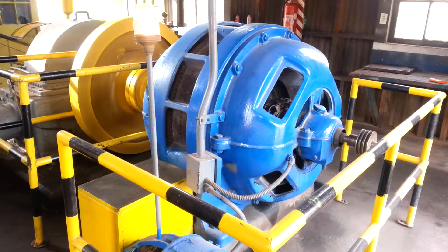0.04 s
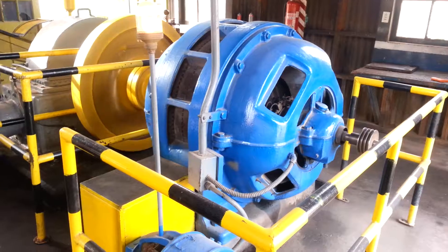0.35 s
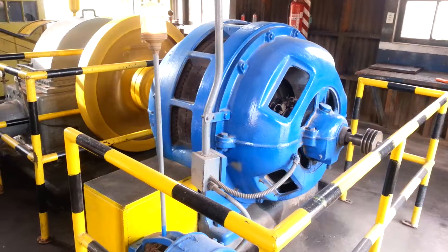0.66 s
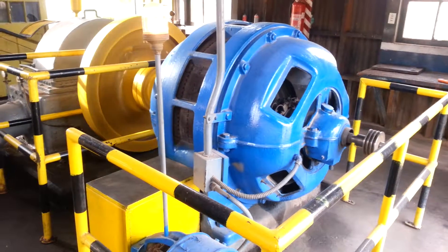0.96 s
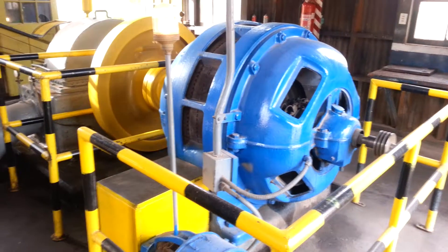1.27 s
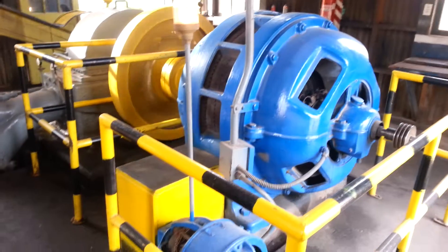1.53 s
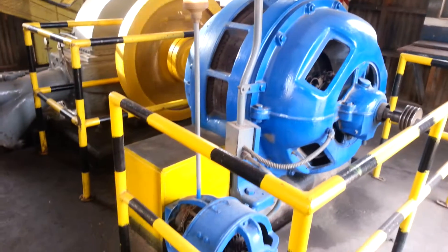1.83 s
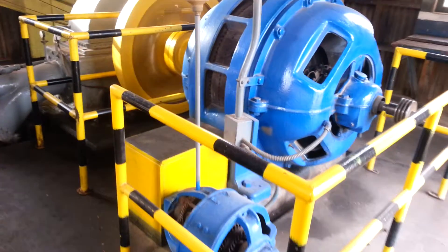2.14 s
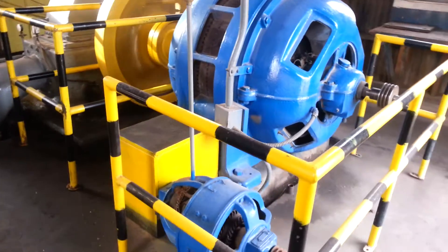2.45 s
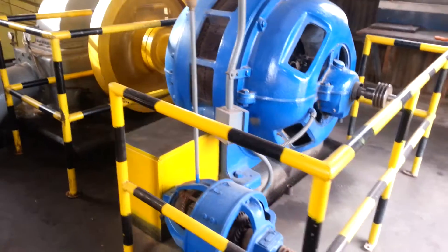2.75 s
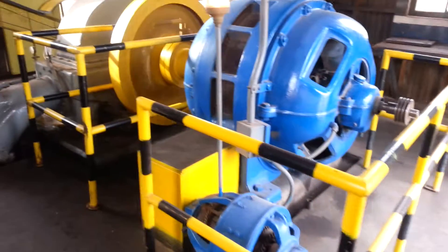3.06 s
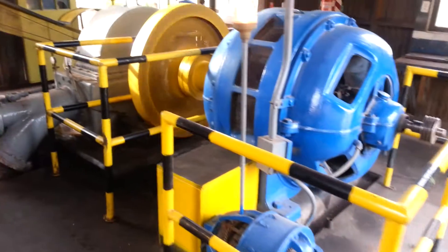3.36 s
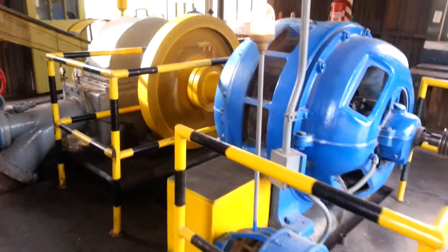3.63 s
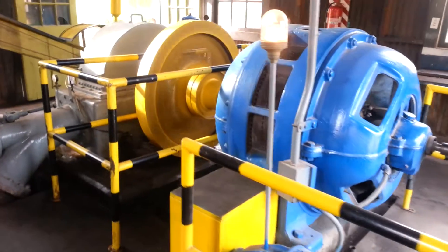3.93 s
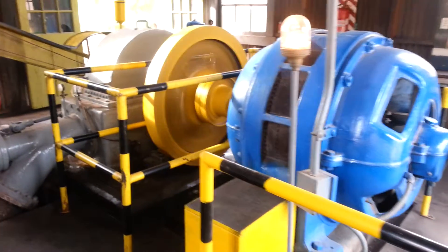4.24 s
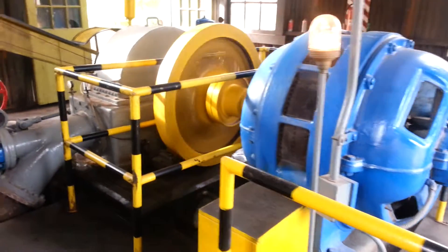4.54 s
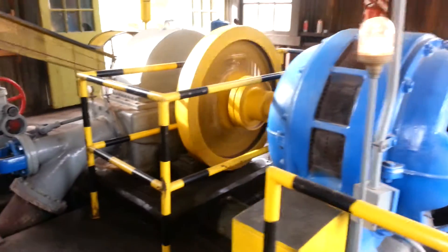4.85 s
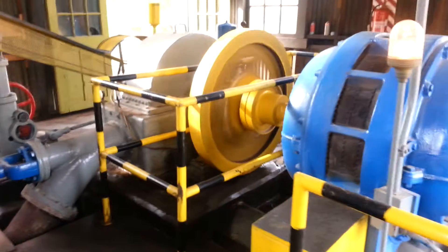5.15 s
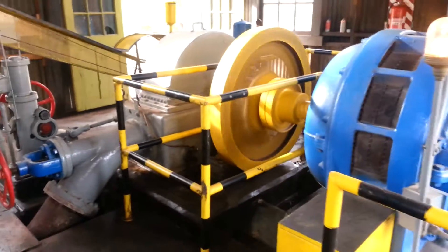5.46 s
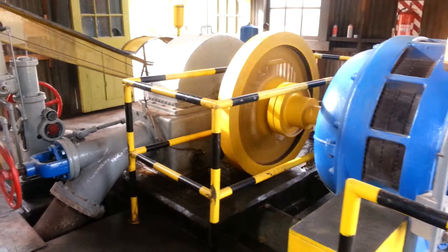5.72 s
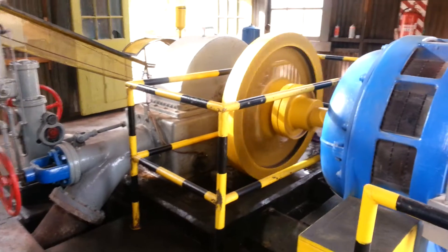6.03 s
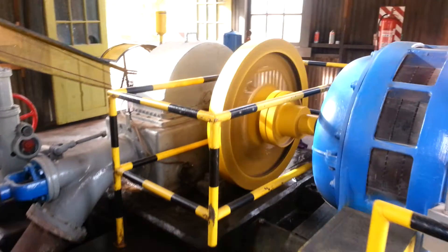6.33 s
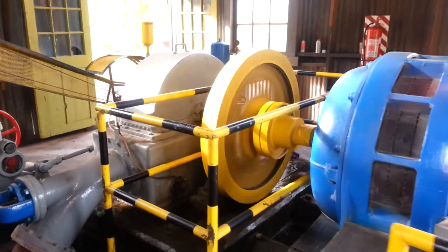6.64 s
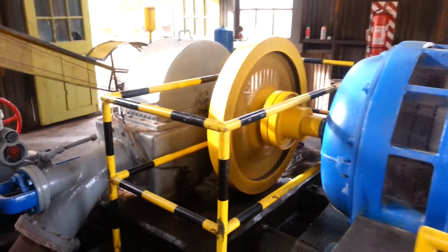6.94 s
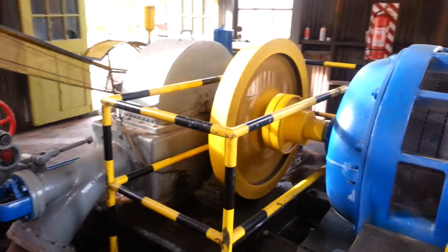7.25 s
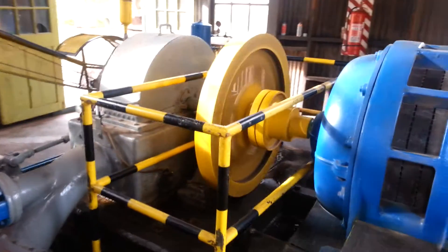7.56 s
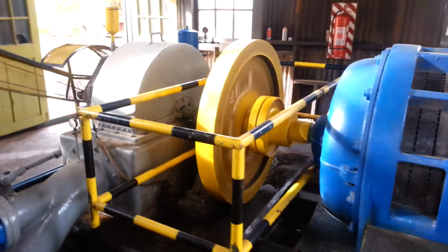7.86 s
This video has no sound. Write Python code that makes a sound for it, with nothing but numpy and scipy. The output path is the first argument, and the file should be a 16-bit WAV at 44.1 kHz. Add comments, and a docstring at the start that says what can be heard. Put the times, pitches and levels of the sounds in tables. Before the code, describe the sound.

After a brief silence, the loud roar of a water turbine fades in and runs steadily inside a hard-walled machine hall. A generator adds a low hum and many higher whining tones, while the iron casing rings with a fast, slight throb. The tones swell and sink as the stereo microphone is carried along the machines. A low tone slides down briefly midway, and the hiss and hum grow a little stronger toward the end.

```python
"""A water turbine roars in a hard-walled hall, driving a flywheel and a generator.
Turbulent flow gives broadband noise that throbs with the shaft and excites the iron casing's modes.
The generator hums and whines; tones swell and sink as a camera, carried along the railing, takes its
two microphones through the hall's standing waves. A low tone slides down once and a hand bumps the
camera. The sound fades in and its peaks clip."""
import sys
import numpy as np
from scipy import signal
from scipy.fft import rfft, irfft, next_fast_len
from scipy.io import wavfile
from scipy.ndimage import uniform_filter1d, map_coordinates

SR = 44100
rng = np.random.default_rng(int(sys.argv[2]) if len(sys.argv) > 2 else 0)


def write(x):
    x = np.atleast_2d(x).T
    wavfile.write(sys.argv[1], SR, np.round(np.clip(x, -1, 1) * 32767).astype(np.int16))


N = 356769


def amp(db):
    """Amplitude ratio of a level in decibels."""
    return 10 ** (np.asarray(db) / 20)


def unit(x):
    """Normalisation to rms 1."""
    return x / np.sqrt(np.mean(x ** 2) + 1e-20)


def spectrum_at(points, hz):
    """Interpolation of (frequency, value) points on a logarithmic frequency axis."""
    point_hz, values = np.transpose(points)
    return np.interp(np.log(hz + 1), np.log(point_hz + 1), values)


def curves(rows):
    """Linear interpolation in time: one curve for each column after the first."""
    time_s, *columns = np.transpose(rows)
    return [np.interp(np.arange(N) / SR, time_s, column) for column in columns]


def wobble(rate_hz):
    """Slow random modulation of rms about 1: a spline through rate_hz knots a second."""
    coarse = np.linspace(0, N, 2048)
    knots = rng.standard_normal(2048)
    spline = map_coordinates(knots, [coarse * rate_hz / SR], mode="wrap")
    return np.interp(np.arange(N), coarse, spline)


def hump(centre_s, width_s):
    """Gaussian envelope of height 1, width_s wide at half height."""
    t = np.arange(N, dtype=np.float32) / SR
    return np.exp2(-np.minimum((2 * (t - centre_s) / width_s) ** 2, 20))


def filtered(x, response):
    """Linear filtering: the spectrum of x times a frequency response."""
    size = next_fast_len(N + SR // 4)
    return irfft(rfft(x, size) * response(np.fft.rfftfreq(size, 1 / SR)), size)[..., :N]


def split(x, edge_hz):
    """Complementary crossover: the parts of x below and above an edge."""
    low = filtered(x, lambda hz: 1 / (1 + (hz / edge_hz) ** 4))
    return low, x - low


# Likeness of the hall's sound at the two microphones: frequency_hz, correlation
COHERENCE = [(40, .8), (100, .89), (190, .96), (400, .85), (600, .74), (800, .63), (1000, .38), (1300, .06),
             (1600, -.14), (2050, -.2), (2500, .18), (2850, .16), (3400, .06), (4400, .08), (6000, 0)]
def mid_side_gains(hz):
    """Spatial coherence: long waves reach both microphones alike, short ones unrelated."""
    correlation = spectrum_at(COHERENCE, hz)
    return np.sqrt([(1 + correlation) / 2, (1 - correlation) / 2])


def hall_noise(response):
    """Diffuse field: stereo noise of rms 1, coloured by a frequency response."""
    mid, side = filtered(rng.standard_normal((2, N)), lambda hz: response(hz) * mid_side_gains(hz))
    return unit(np.array([mid + side, mid - side]))


# The walk, from 0 beside the generator to 1 closest to the turbine: time_s, nearness
WALK = [(.9, 0.17), (1.8, 0.3), (2.5, 0), (3.2, 0.071), (4.4, 0.4), (6.1, 0.69), (7.6, 0.82), (8.09, 0.68)]
def approach(generator_db, rise_db):
    """Level rises as distance falls: the gain of one band as the microphones near the turbine."""
    nearness, = curves(WALK)
    return amp(generator_db + rise_db * nearness)


SHAFT_HZ = 12.15
def throb(clock, turn_db, blade_db, churn_db):
    """Amplitude modulation: the flow surges once a turn, is chopped by blades and churns at random."""
    angle = 2 * np.pi * SHAFT_HZ * clock
    harmonics = [(4, .45), (8, .55), (12, .5)]  # shaft_order, weight
    blades = sum(weight * np.cos(order * angle + rng.uniform(0, 2 * np.pi))
                 for order, weight in harmonics)
    return amp(turn_db * np.cos(angle) + blade_db * blades + churn_db * wobble(22))


# Spectral density of rushing water and cooling air: frequency_hz, relative_level_db
FLOW_SPECTRUM = [(22, -56), (45, -33), (70, -19.5), (105, -15.5), (150, 0.5), (280, 0), (500, -3.5),
                 (900, -7.5), (1500, -8.5), (1900, -13.5), (3600, -20), (6000, -27), (11000, -40),
                 (15600, -46.5)]
# Rumble of the pipe along the walk: time_s, gain_db
PIPE_RUMBLE = [(.9, -4.5), (1.9, -0.5), (2.8, -2), (3.6, -0.5), (4.3, 0), (5.0, -2.5), (6.2, -0.5),
               (7.2, 1.5), (8.09, -8)]
def water(clock):
    """Turbulence radiates broadband noise: rumble in the pipe, roar in the runner, hiss of spray."""
    flow = hall_noise(lambda hz: amp(spectrum_at(FLOW_SPECTRUM, hz)))
    rumble, rest = split(flow, edge_hz=300)
    body, rest = split(rest, edge_hz=770)
    roar, rest = split(rest, edge_hz=2700)
    hiss, spray = split(rest, edge_hz=9500)
    rumble_db, = curves(PIPE_RUMBLE)
    rumble *= amp(rumble_db)
    body *= approach(-0.5, rise_db=0.2) * throb(clock, turn_db=0.0, blade_db=-0.5, churn_db=0.0)
    roar *= approach(-0.2, rise_db=3.5) * throb(clock, turn_db=0.15, blade_db=1.0, churn_db=1.5)
    treble = approach(-2.2, rise_db=2.5) * hiss + approach(-2.5, rise_db=7) * spray
    treble *= throb(clock, turn_db=0.53, blade_db=1.0, churn_db=1.0)
    return amp(-12.0) * (rumble + body + roar + treble)


# Loud and dead spots along the walk: centre_s, pitch_hz, width_s, gain_db
STANDING_WAVES = [(4.0, 85, .5, 3), (5.7, 85, .6, 10), (3.8, 98, .5, 6), (6.1, 98, 1.5, 4.5),
                  (7.9, 98, .7, 8), (1.4, 122, 1.2, -4), (5.2, 122, 1.2, 3), (7.7, 122, 1, -7),
                  (4.5, 146, 1.4, 4), (7.7, 146, .8, -6), (1.7, 194, .22, 4.5), (2.2, 194, .35, 5),
                  (2.7, 194, .36, 11.6), (3.05, 194, .25, 7.5), (3.38, 194, .33, 7.8),
                  (3.78, 194, .17, -10), (4.05, 194, .2, 3.5), (4.3, 194, .17, -5), (4.7, 194, .45, 4),
                  (5.5, 194, .25, -2.5), (6.12, 194, .25, 3.8), (6.56, 194, .12, -10), (6.75, 194, .5, 4.5),
                  (7.28, 194, .4, 5.5), (7.9, 194, .65, 15.3), (2.1, 242.5, .7, 9), (.7, 245, 1, -6),
                  (8.0, 245, .9, -10), (1.05, 305, .3, 6), (2.25, 305, .7, 8), (3.1, 305, .25, 7),
                  (7.9, 305, .8, -8), (4.6, 393, 2.2, 5.5), (7.5, 420, 1, 7), (7.9, 576, 1.2, 14.5),
                  (4.7, 587, 1, -4), (1.2, 587, .6, -7), (3.42, 587, .7, 12), (6.15, 587, 1, 10),
                  (6.6, 607, .5, 8), (1.1, 620, .9, -9), (2.5, 620, .6, -6), (5.8, 620, .35, 7),
                  (6.4, 620, .4, 6), (.95, 722, .6, 12.5), (1.8, 722, .6, 7), (.9, 770, .55, 10),
                  (7.0, 770, .42, 16), (7.58, 770, .6, 12.5), (4.7, 781, .35, 10.5), (5.9, 781, .4, 16),
                  (6.4, 781, .35, 15), (7.05, 781, .35, 13), (1.45, 966, .45, 8.5), (2.1, 966, .7, 9.5),
                  (6.05, 966, .3, 10.5), (7.7, 966, .9, 9.5), (1.1, 1007, 1, 13.5), (1.25, 1036, 1, 14),
                  (7.4, 1036, .9, 12), (.92, 1056, 1.05, 17.5), (6.7, 1056, .6, 7), (7.55, 1056, .45, 10),
                  (3.45, 1177, 1, 12), (4.9, 1177, 1, 7), (6.5, 1177, .6, 10), (2.3, 1227, .7, 8),
                  (3.1, 1227, .4, 6), (5.2, 1227, .8, 10), (.9, 1191, .8, -3), (2.2, 1191, .9, -3),
                  (5.7, 1191, 1, 2), (7.2, 1191, .4, 3), (8.05, 1191, .9, -13), (.7, 1364, .7, -5),
                  (2.3, 1364, .9, 2), (4.2, 1364, .4, 2.5), (6.75, 1364, .8, 3), (8.05, 1364, .5, -5),
                  (1.42, 1450, .45, 12), (2.1, 1450, .6, 7), (5.5, 1450, .8, 7), (6.45, 1450, .35, 10.5),
                  (7.25, 1450, .8, 9), (1.35, 1474, .4, 7), (3.1, 1474, .35, 6), (3.8, 1474, .45, 8),
                  (4.5, 1474, .4, 6), (5.3, 1474, .5, 9), (5.95, 1474, .4, 10), (6.45, 1474, .3, 7),
                  (7.9, 1474, .7, -7), (1.0, 1513, .7, 10), (3.1, 1594, .6, 4), (5.35, 1594, .8, 7),
                  (1.1, 2515, .6, 3.5), (6.2, 2515, .35, 3.5), (6.7, 2515, .3, -2), (7.1, 2515, .3, 4),
                  (7.6, 2515, .3, 2), (1.05, 2810, .25, 3.5), (1.75, 2810, .9, 3), (2.9, 2810, .6, -1.5),
                  (3.66, 2810, .3, 2.8), (4.67, 2810, .16, 3), (5.4, 2810, .8, -1.5), (6.15, 2810, .18, 3),
                  (6.5, 2810, .3, -2), (7.2, 2810, .3, 1.2), (8.05, 2810, .4, -4), (1.9, 3084, .4, 5),
                  (3.55, 3084, .4, -9), (4.05, 3084, .3, 7), (4.1, 3199, .8, 7), (5.05, 3230, .4, 12),
                  (7.35, 3230, .4, 5), (6.3, 4302, .6, 10.5), (7.3, 4302, .4, 10), (2.1, 4449, 2, -3),
                  (3.45, 4449, .3, -2), (4.05, 4449, .15, 5), (5.4, 4449, .25, 2), (6.1, 4449, .25, 2.2),
                  (6.78, 4449, .15, 4), (7.0, 4449, .2, -3.5), (7.23, 4449, .16, 3.5),
                  (7.45, 4449, .2, 1.5), (8.0, 4449, .5, -2.5), (2.8, 6973, .2, 3), (3.75, 6973, .45, 2),
                  (4.85, 6973, .4, 3.5), (7.1, 6973, 2, -2), (1.75, 9100, .2, 12)]
def swell_db(hz):
    """Standing waves: a tone or mode rises near its antinodes and dips near its nodes."""
    return sum(gain_db * hump(centre_s, width_s)
               for centre_s, pitch_hz, width_s, gain_db in STANDING_WAVES if pitch_hz == hz)


def resonances(modes):
    """Resonance under random forcing: each mode passes a narrow band of noise, and their powers add."""
    def power(f):
        return sum(amp(db) ** 2 / (1 + ((f * f - hz * hz) / ((f + 1) * width_hz * 1.75)) ** 2) ** 2
                   for hz, width_hz, db in modes)
    rms = np.sqrt(sum(amp(db) ** 2 * width_hz for _, width_hz, db in modes))
    return rms * hall_noise(lambda f: np.sqrt(power(f)))


def shifting_echoes(x, depth_db):
    """Selective fading: neighbouring bands swell and sink separately as echoes shift; rms 1."""
    spectra = signal.stft(x, nperseg=2048)[2]
    fading = uniform_filter1d(rng.standard_normal(spectra.shape[1:]), size=4, axis=0)  # over frequency
    for frames in (12, 5):  # over time
        fading = uniform_filter1d(fading, size=frames, axis=1)
    faded = signal.istft(spectra * amp(depth_db * unit(fading)), nperseg=2048)[1]
    return unit(faded[:, :N])


# Resonances of the casing and pipes: pitch_hz, bandwidth_hz, relative_level_db
CASING_MODES = [(305, 30, -8), (386, 20, -7.5), (620, 38, -9), (733, 23, -8), (777, 17, -9), (965, 30, -6),
                (1191, 55, -3), (1364, 93, -7), (1456, 28, -7.5), (1512, 63, -7.8), (1689, 20, -11.2),
                (2063, 149, -12.5), (2515, 110, -10.5), (2706, 35, -8.8), (2810, 140, -7.2),
                (3084, 41, -13), (3184, 27, -12.6), (3560, 250, -22), (4282, 75, -18.5), (4449, 240, -18.2),
                (5032, 165, -26.5), (5620, 456, -32), (6973, 381, -26.7), (7529, 176, -32.8),
                (9100, 600, -44), (9836, 434, -40.6)]
# Strength of the ring along the walk: time_s, low_gain_db, middle_gain_db
RING_GAINS = [(.9, 4.5, -5), (1.5, 1, -3), (2.2, 1.8, -0.5), (3.0, 0.5, 0), (3.6, 1.5, -1.5),
              (4.5, 0, -0.5), (5.3, 0.4, 4), (6.2, -0.5, 1.5), (6.9, -4, 3), (7.55, 3, 2), (8.09, 1, 2)]
def casing(clock):
    """Forced vibration: churning water rings the iron casing; high modes carry best near the turbine."""
    swelling_hz = [row[1] for row in STANDING_WAVES]
    even = resonances([mode for mode in CASING_MODES if mode[0] not in swelling_hz])
    swelling = sum(amp(swell_db(mode[0])) * resonances([mode])
                   for mode in CASING_MODES if mode[0] in swelling_hz)
    modes = shifting_echoes(even + swelling, depth_db=1.2)
    low, rest = split(modes, edge_hz=2000)
    middle, high = split(rest, edge_hz=3600)
    low_db, middle_db = curves(RING_GAINS)
    ring = amp(low_db) * low + amp(middle_db) * middle + approach(-4, rise_db=7) * high
    return amp(-14.5) * ring * throb(clock, turn_db=0.2, blade_db=1.25, churn_db=0.5)


# Nodes passing between the microphones: centre_s, pitch_hz, width_s
NODE_CROSSINGS = [(6.55, 1177, .8), (6.9, 1450, 1.5), (4.4, 1474, .6), (6.55, 1474, .4), (3.1, 1594, 1)]
def across_nodes(pair, hz, mid_db=-21, side_db=5):
    """Phase reversal: microphones on either side of a node hear a tone in opposite phase."""
    crossings = [hump(centre_s, width_s)
                 for centre_s, pitch_hz, width_s in NODE_CROSSINGS if pitch_hz == hz]
    if not crossings:
        return pair
    mid_gain, side_gain = amp(np.outer([mid_db, side_db], sum(crossings)))
    left, right = pair
    mid, side = mid_gain * (left + right) / 2, side_gain * (left - right) / 2
    return np.array([mid + side, mid - side])


def hall_tone(hz, clock, scatter, flutter_hz):
    """Interference: a steady tone adds to echoes whose strength and phase keep shifting."""
    phase = (2 * np.pi * ((hz * clock + rng.random()) % 1)).astype(np.float32)
    sine, cosine = np.sin(phase), np.cos(phase)
    def echoes():
        return scatter * (wobble(flutter_hz) * sine + wobble(flutter_hz) * cosine)
    mid_gain, side_gain = mid_side_gains(hz)
    mid = mid_gain * (sine + echoes())
    side = side_gain * (cosine + echoes())
    return across_nodes(unit(np.array([mid + side, mid - side])), hz)


# The generator's steadier tones above its drone: pitch_hz, relative_level_db
HUM_TONES = [(242.5, -33.5), (245, -29.7), (393, -36.5), (576, -39.5), (587, -38), (722, -42), (770, -41),
             (781, -41), (966, -41), (1007, -42), (1036, -42), (1056, -40.5), (1177, -37.5), (1227, -41),
             (1450, -37.5), (1474, -36), (3230, -45), (4302, -49.5)]
def hum(clock, drone_hz=194.0, drone_db=-24, waver_db=0.5, tones_db=4.5):
    """Line spectrum: a nearly pure drone lies under more scattered tones, whose close pairs beat."""
    drone_gain = amp(drone_db + swell_db(drone_hz) + waver_db * wobble(7.5))
    drone = drone_gain * hall_tone(drone_hz, clock, scatter=0.17, flutter_hz=6.4)
    tones = sum(amp(tones_db + db + swell_db(hz)) * hall_tone(hz, clock, scatter=0.39, flutter_hz=8.7)
                for hz, db in HUM_TONES)
    return drone + tones


# Weak tones of blades, slots and bearings: pitch_hz, relative_level_db
WHINE_TONES = [(85, -49), (98, -44), (122, -33.5), (146, -32), (173, -33.5), (184, -33), (366, -33.5),
               (420, -38), (607, -37), (879, -38), (1196, -34), (1402, -35), (1513, -37.8), (1594, -38),
               (1972, -40), (2137, -40.4), (2409, -39), (2482, -38.5), (2712, -40), (2963, -39.5),
               (3011, -41), (3199, -42.5), (4094, -50), (4176, -47.5), (4399, -46.5), (4496, -45),
               (7074, -54.2)]
def whine(clock, gain_db=1.5):
    """Multipath fading: the shorter a tone's wave, the faster it flutters as the microphones move."""
    return sum(amp(gain_db + db + swell_db(hz))
               * hall_tone(hz, clock, scatter=1.0, flutter_hz=4 + np.sqrt(hz) / 10)
               for hz, db in WHINE_TONES)


# A low tone that sinks and fades: time_s, pitch_hz, level_db
GROAN_GLIDE = [(3.9, 157, -70), (4.05, 154.7, -17), (4.22, 140.7, -29), (4.34, 123, -21),
               (4.48, 102.5, -29), (4.62, 98, -51), (4.9, 94.5, -70)]
def groan():
    """Glide: one tone slides down under the rumble, its phase the integral of its frequency."""
    pitch_hz, level_db = curves(GROAN_GLIDE)
    phase = 2 * np.pi * np.cumsum(pitch_hz) / SR
    return amp(level_db) * np.sqrt(2) * np.sin(phase)


# A soft push on the camera body: centre_s, peak_db
HAND_BUMPS = [(5.678, -24)]
def hand_bump(contact_s=0.0028):
    """Structure-borne sound: a shifting hand gives one smooth pulse, heard as a dull bump."""
    t = np.arange(N) / SR
    return sum(amp(peak_db) * np.exp(-((t - centre_s) / contact_s) ** 2)
               for centre_s, peak_db in HAND_BUMPS)


def scene():
    """Superposition: the sources add; throb, hum and whine follow one shaft's slightly wandering speed."""
    clock = np.cumsum(1 + .0003 * wobble(2.5)) / SR
    mix = water(clock) + casing(clock) + hum(clock) + whine(clock) + groan() + hand_bump()
    # Stereo balance: frequency_hz, left_minus_right_db
    balance = [(60, -6.5), (200, -1.3), (600, -1.5), (1300, 1.0), (3500, 1.5), (9000, 0.7)]
    return filtered(mix, lambda hz: amp(np.outer([.5, -.5], spectrum_at(balance, hz))))


# A quick rise from silence: time_s, gain
FADE_IN = [(.627, 0), (.628, .18), (.875, 1)]
TOP_HZ = 15780
def record(dry):
    """Saturation: after the fade-in, peaks round off at full scale and a low-pass limits the band."""
    gain, = curves(FADE_IN)
    faded = dry * gain
    clipped = faded / (1 + np.abs(faded) ** 24) ** (1 / 24)
    return filtered(clipped, lambda hz: np.clip((TOP_HZ - hz) / 40, 0, 1))


dry = scene()
out = record(dry)
write(out)
```